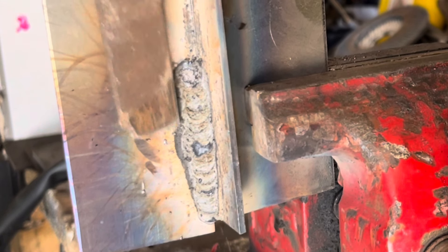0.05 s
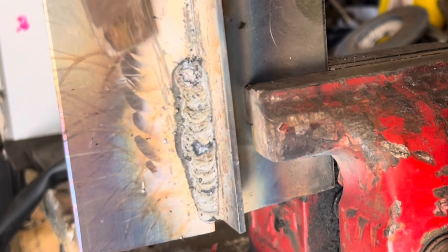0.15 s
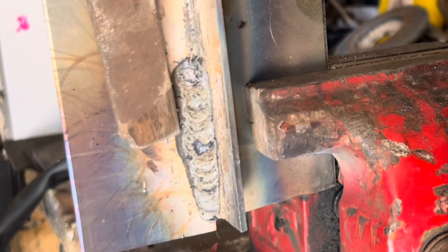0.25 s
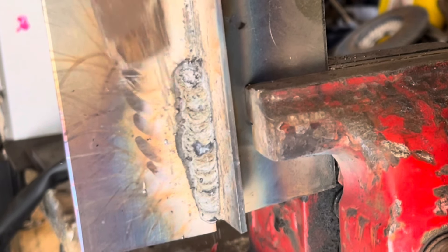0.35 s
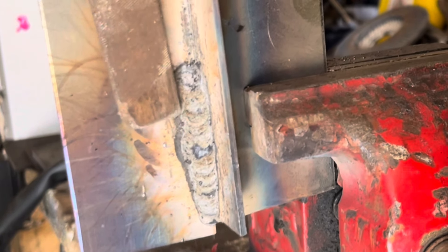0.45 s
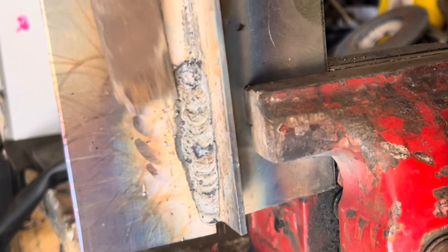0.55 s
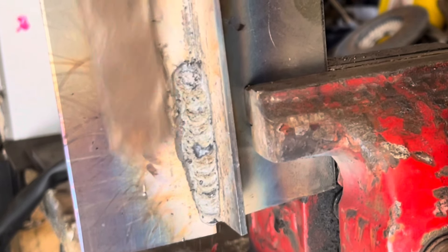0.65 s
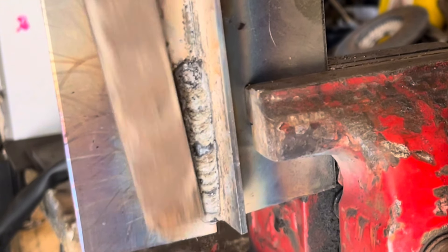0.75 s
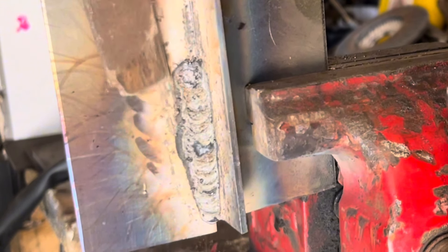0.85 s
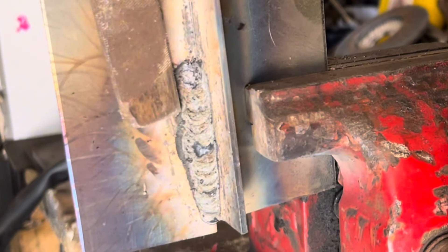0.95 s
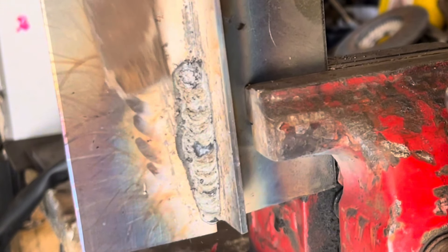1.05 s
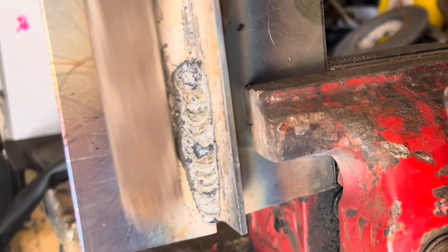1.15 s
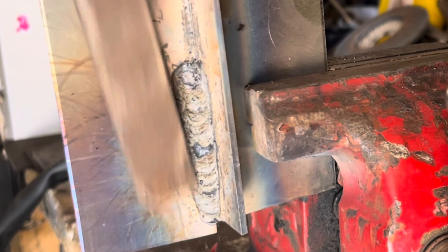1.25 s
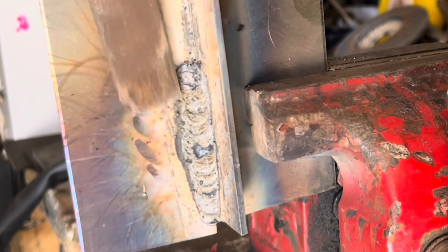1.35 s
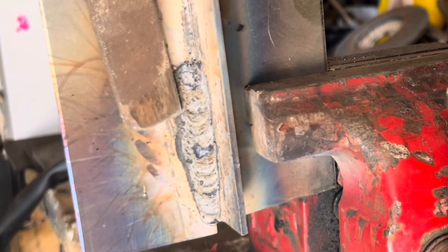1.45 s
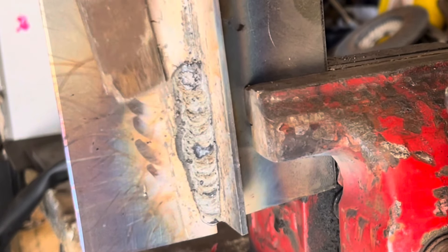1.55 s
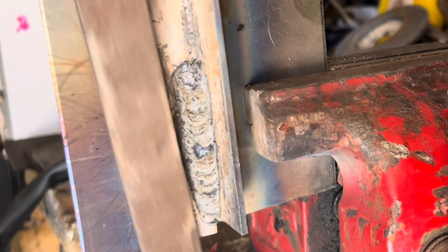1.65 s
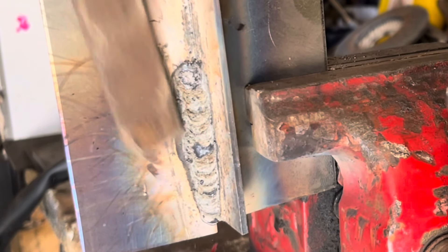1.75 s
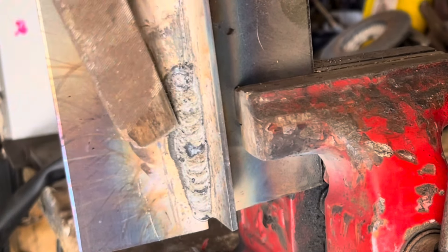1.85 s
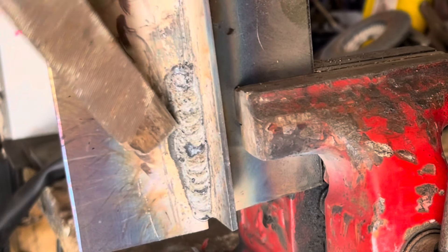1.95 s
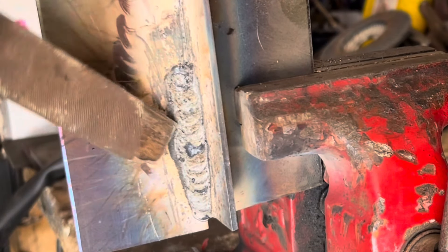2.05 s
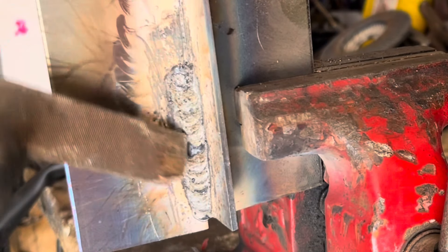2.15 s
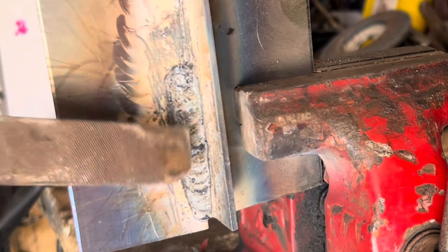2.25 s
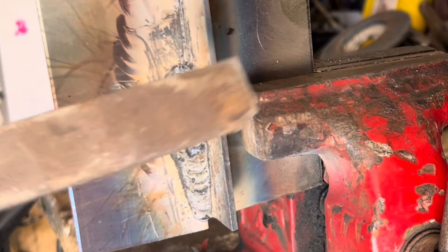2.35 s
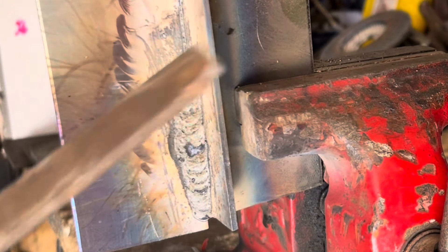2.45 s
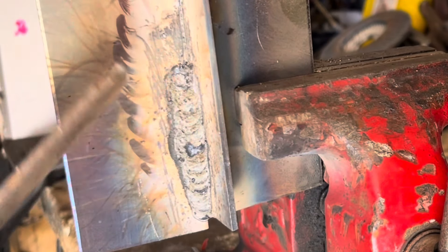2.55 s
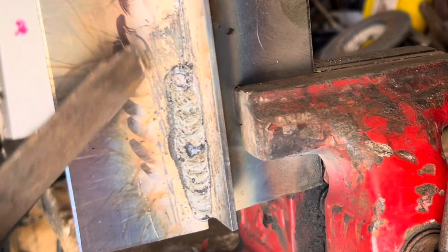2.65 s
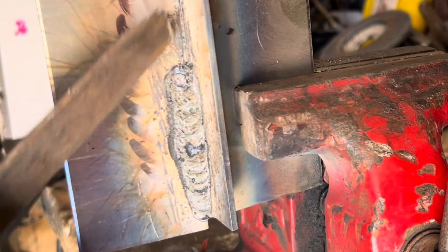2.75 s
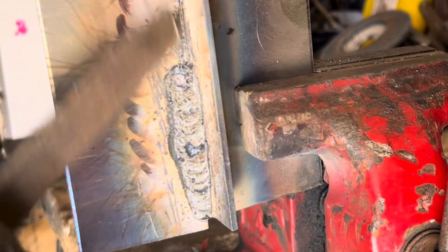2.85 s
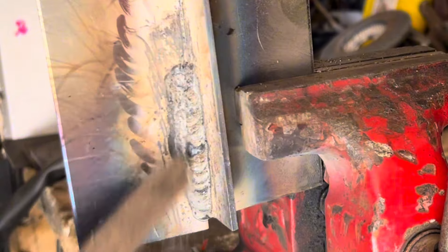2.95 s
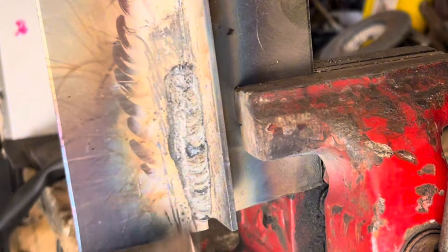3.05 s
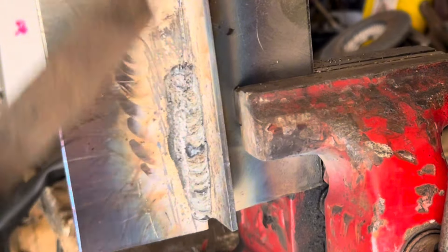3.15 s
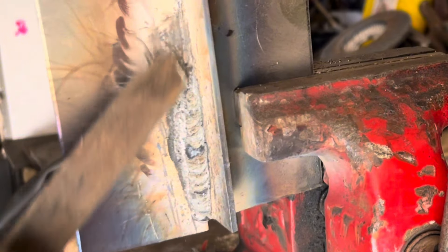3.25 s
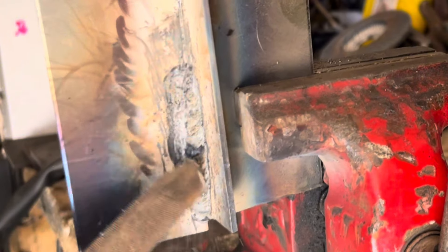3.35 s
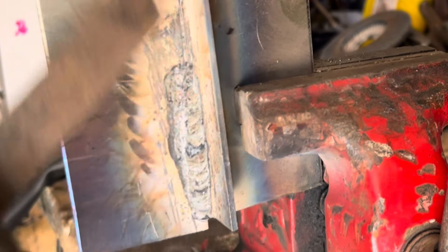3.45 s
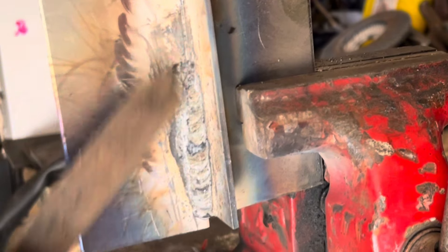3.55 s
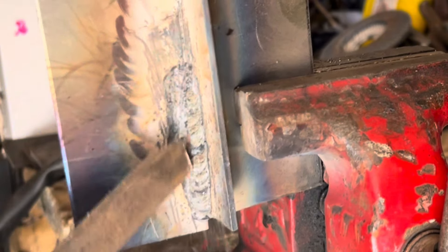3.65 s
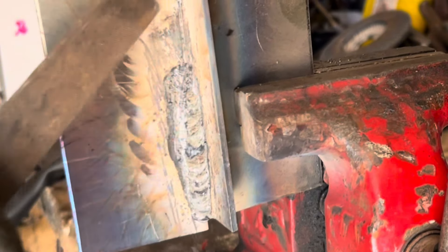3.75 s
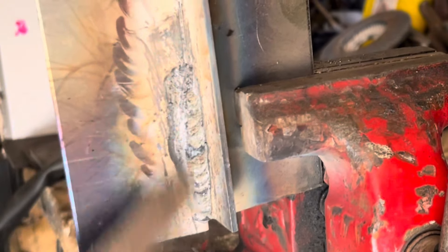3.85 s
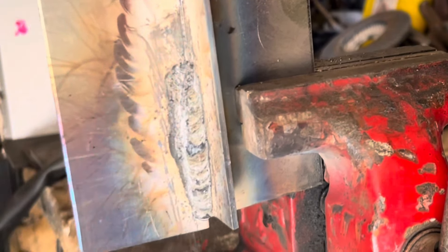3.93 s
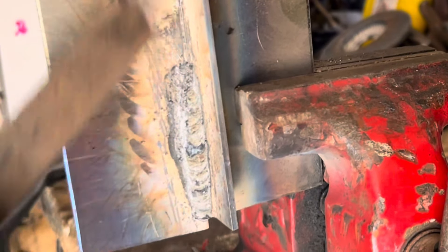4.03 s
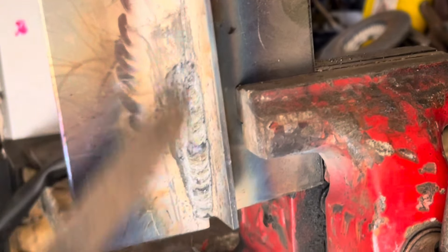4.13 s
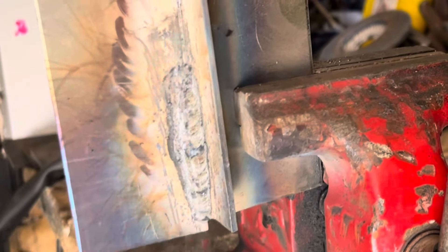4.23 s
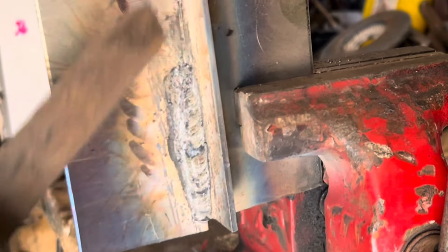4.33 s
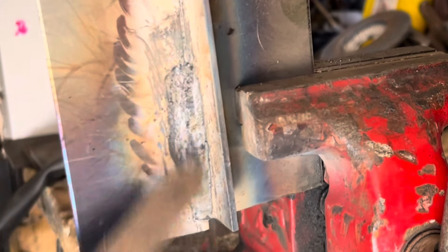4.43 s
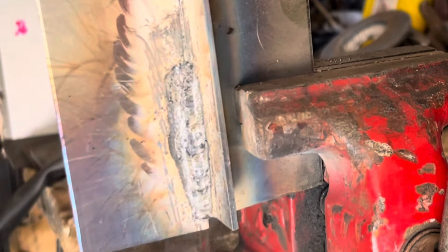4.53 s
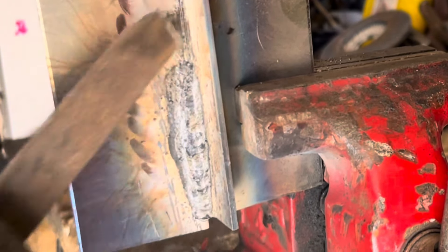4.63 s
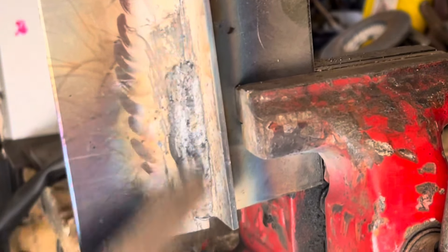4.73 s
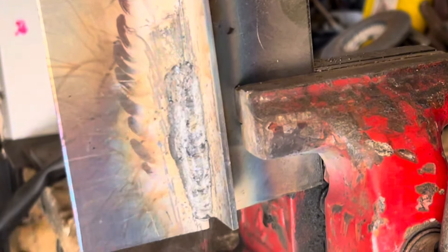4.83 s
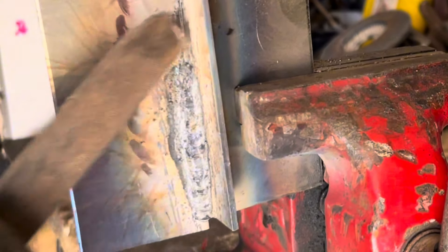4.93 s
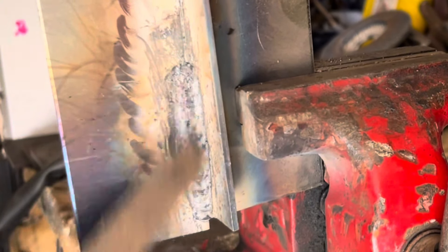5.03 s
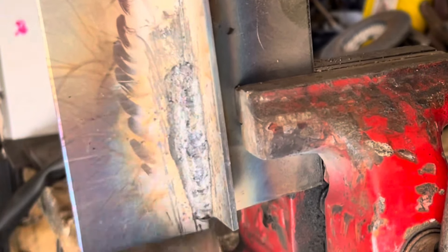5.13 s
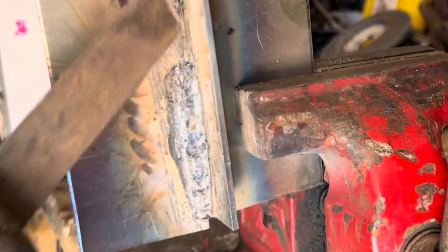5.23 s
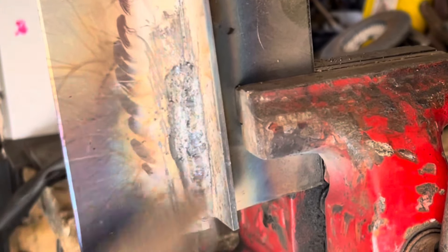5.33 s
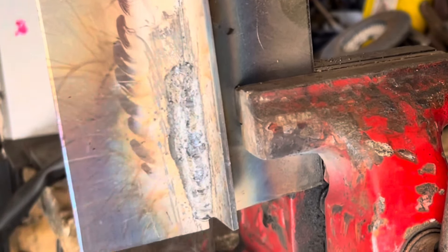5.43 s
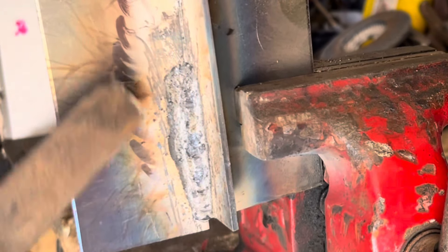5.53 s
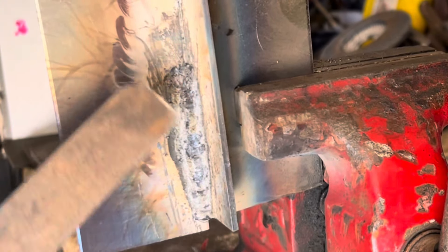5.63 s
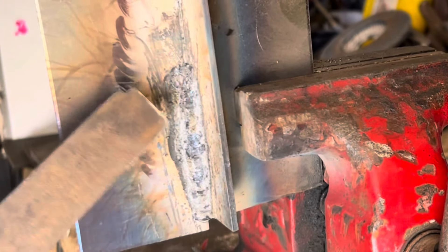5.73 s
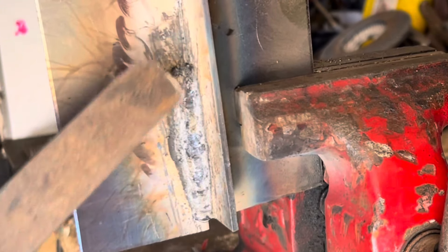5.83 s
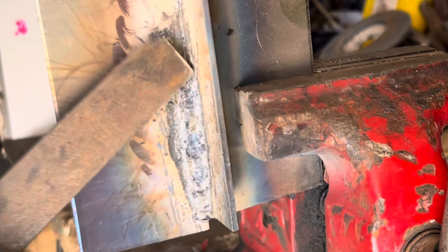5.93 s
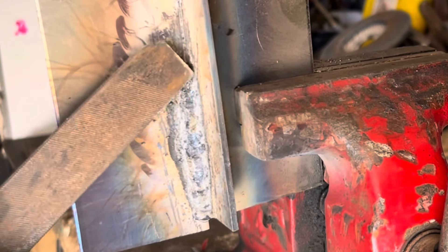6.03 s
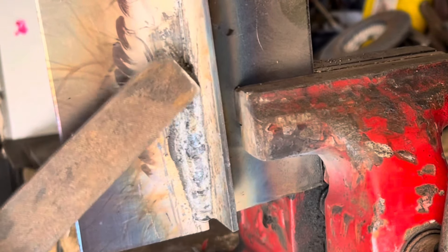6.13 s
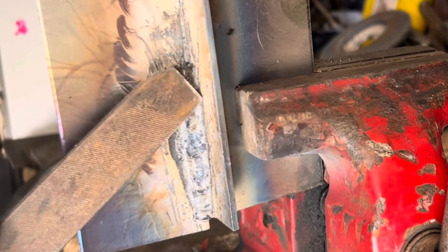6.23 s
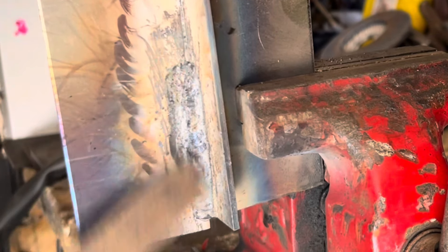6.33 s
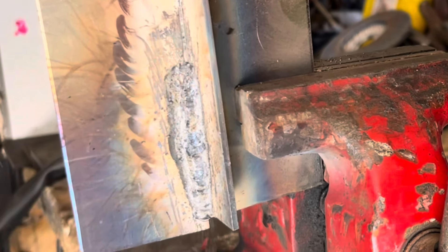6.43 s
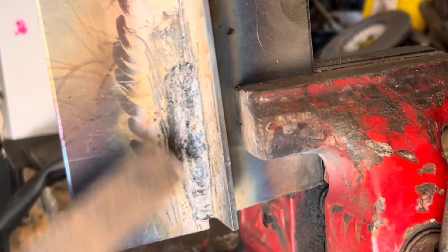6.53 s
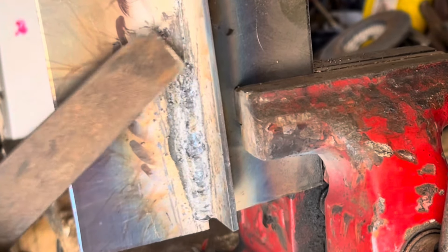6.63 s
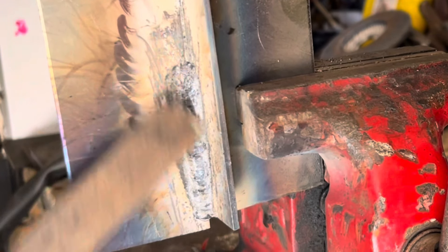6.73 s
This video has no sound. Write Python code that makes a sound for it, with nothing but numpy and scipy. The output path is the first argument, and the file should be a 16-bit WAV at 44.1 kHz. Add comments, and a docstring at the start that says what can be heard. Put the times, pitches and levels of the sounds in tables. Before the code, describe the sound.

A steel file rubs quickly back and forth over a welded plate clamped in a vise, with gritty rasps, small clicks and tiny squeaks. After a short lull, its tip jabs the weld about three times a second, each knock running into a crunchy scrape and a brief metallic ring. A few separate scrapes finish. It is heard close up in a small workshop with a faint fan hum.

```python
"""A small workshop with a humming fan, where a steel hand tool scrubs slag (a brittle crust) off a weld.
First the tool rubs flat, to and fro; then its tip is jabbed along the weld, knocking and scraping;
last its edge is pressed in. A scrape is thousands of tiny clicks as the steel catches and lets go.
They shake the tool and the welded plate, which is clamped in a vise. Touching muffles the steel,
so it rings longest when the tool slips off. All of it is heard from close by, in stereo."""
import sys
import numpy as np
from scipy import signal
from scipy.fft import rfft, irfft, next_fast_len
from scipy.io import wavfile
from scipy.ndimage import uniform_filter1d

SR = 44100
rng = np.random.default_rng(int(sys.argv[2]) if len(sys.argv) > 2 else 0)


def pcm_store(signal):
    """Save signal as 16-bit PCM."""
    levels = np.round(np.clip(np.atleast_2d(signal), -1, 1) * 32767)
    wavfile.write(sys.argv[1], SR, levels.astype(np.int16).T)


N = 298998
TIME = np.arange(N) / SR
HZ = np.fft.rfftfreq(N, 1 / SR)
SIDES = np.array([[.5], [-.5]])  # splits a difference between left and right

# Levels in all tables are relative. A spectrum says how strong each frequency is.
# spectrum of crumbling slag: f/Hz, level/dB
GRIT_SPECTRUM = [(2500, -7), (4300, -1.5), (6000, 3.5), (8000, -6.5), (10000, 1), (12500, 2.5),
                 (14000, -5.5), (15000, -16), (16000, -36)]
# spectrum of the tip rasping on the weld: f/Hz, level/dB
TIP_SPECTRUM = [(190, -19.5), (270, -5.5), (370, -6.5), (520, -0.5), (850, 1), (1050, -4), (1500, 0.5),
                (2200, -1), (3400, -4.5), (4500, -9), (7000, -24.5)]
# Modes are the tones an object rings at. Those of the plate and vise:
# f/Hz, level/dB, time to fade freely by 60 dB/s, left minus right/dB, left phase lead/rad
PLATE_MODES = [(298, 14, .5, 0, -.7), (2681, 19, 1.2, 5, .3), (3085, 7, .6, 1, .9), (4409, 6, 1, 1, -1.5),
               (191, 1, .08, 0, 0), (250, 5, .05, 0, 0), (540, 4, .05, 0, .5), (1158, 5, .08, 0, 0),
               (470, 5, .06, -2, .6), (372, 7, .12, 1, -.5), (620, 7, .05, 1, -.7), (838, 9, .05, -1, -1.5),
               (923, 9, .09, -3, -1.5), (1278, 8, .06, 0, .9), (1348, 8, .1, -2, 2.5),
               (1440, 6, .06, -1, -2.8), (1520, 4, .08, 0, 1), (2965, 7, .04, 1, .9), (3552, 2, .04, 2, .1),
               (5778, 3, .04, 2, -.4), (10938, 5, .12, 0, .1), (11372, 9, .18, 0, 0), (12080, 5, .06, 0, 0)]
# modes of the hand tool: same columns
HAND_TOOL_MODES = [(1957, 21, .3, 1, .6), (7429, 26, .33, 1, -2.1), (7958, 25, .27, 0, -3),
                   (8916, 16, .26, 0, 2.9), (9622, 23, .3, 0, 1.9), (14190, 13, .26, 1, -2),
                   (3922, 12, .1, 0, 1.2), (6642, 12, .04, 2, -1.5), (7052, 9, .06, 2, -1.8),
                   (8630, 13, .025, 0, 3.1)]


def amp(db):
    """Turns decibels into a factor to multiply by."""
    return 10 ** (np.asarray(db) / 20)


def unit(x):
    """Scales a signal to an average strength (rms) of one."""
    return x / np.sqrt(np.mean(x ** 2) + 1e-20)


def look_up(points, hz):
    """Reads between the rows of a (frequency, value) table, on a log frequency axis."""
    f, value = np.transpose(points)
    return np.interp(np.log(hz + 1), np.log(f + 1), value)


def colour(x, spectrum):
    """Filters a signal by a spectrum and scales it to strength one."""
    size = next_fast_len(N, True)
    gain = amp(look_up(spectrum, np.fft.rfftfreq(size, 1 / SR)))
    return unit(irfft(rfft(x, size) * gain, size)[:N])


def wander(rate_hz):
    """A smooth random curve that wiggles up to about the given rate."""
    size = next_fast_len(N, True)
    smoothing = 1 + (np.fft.rfftfreq(size, 1 / SR) / rate_hz) ** 4
    return unit(irfft(rfft(rng.standard_normal(size)) / smoothing, size)[:N])


def stereo(left, right):
    """Gives two spectra the small differences in timing and level between left and right."""
    # how far the left wave runs ahead: f/Hz, phase/rad
    phase_lead = [(100, 0), (400, 1.1), (850, -1), (1800, -0.9), (3000, 0.1), (4500, -1.7), (5800, 2.6),
                  (7500, 0), (9400, -5), (10800, -8.5), (13500, -4.5), (14600, -15)]
    # how much louder the left is: f/Hz, level/dB
    balance = [(100, -.5), (1000, .5), (2200, 1.5), (4200, 4), (6500, 5.5), (8000, -1)]
    half = amp(look_up(balance, HZ) / 2) * np.exp(.5j * look_up(phase_lead, HZ))
    return np.array([left * half, right / half])


def diffuse(common, other):
    """Stereo spectra of sound from all around: partly alike on both sides, partly not."""
    # how unlike the sides are: f/Hz, share from 0 to 1
    unlike = [(100, 0.12), (300, 0.7), (900, 1), (4000, 1), (7000, 0.6), (12000, 0.4)]
    apart = np.clip(look_up(unlike, HZ), 0, 1) / 2
    common = rfft(common, N) * np.sqrt(1 - apart)
    other = rfft(other, N) * np.sqrt(apart)
    return stereo(common + other, common - other)


def fan(hum_db=-1, air_db=-48.5, waver=0.0017, flutter_db=-4.5):
    """Blades and motor hum, wavering a little, over a soft rush of air."""
    # blade and motor tones: f/Hz, level/dB
    hum_tones = [(86.1, -62.5), (172.3, -63.5), (339.1, -62.5), (592.2, -52.5), (678.3, -70), (1017, -59),
                 (1190, -55), (1357, -64.5), (1782, -62.5), (2379, -68), (2972, -64.5), (4081, -73)]
    # spectrum of the moving air: f/Hz, level/dB
    air_spectrum = [(15, -35), (30, -15), (80, -21), (250, -9), (600, -6.5), (1100, -8.5), (1600, -17.5),
                    (3000, -18), (6000, -21.5), (8000, -40), (13000, -29), (16000, -54)]
    clock = np.cumsum(1 + waver * wander(rate_hz=6.05)) / SR
    hum = sum(amp(db) * np.sqrt(2) * np.sin(2 * np.pi * (hz * clock + rng.random()))
              for hz, db in hum_tones)
    rushes = [colour(rng.standard_normal(N), air_spectrum) for _ in range(2)]
    air = irfft(diffuse(*rushes), N)
    return amp(hum_db + flutter_db * wander(rate_hz=3.9)) * hum + amp(air_db) * unit(air)


def workshop(near_db=-5, far_db=-8.0, near_fade_s=.019, build_up_s=0.0045):
    """The echo as a filter: quick reflections off bench and vise, then the tail of the room."""
    # length of the room's echo: f/Hz, time to fade by 60 dB/s
    fade_times = [(80, 0.92), (300, 0.54), (1000, 0.47), (4000, 0.43), (12000, 0.18)]
    # spectrum of the reflections: f/Hz, level/dB
    echo_spectrum = [(80, -8), (400, 2.5), (1500, -3.5), (4000, -11), (7000, -7.5), (14000, -49)]
    t = TIME[:SR]
    near = rng.standard_normal((2, SR)) * amp(-60 * t / near_fade_s)
    hz, age, bands = signal.stft(rng.standard_normal((2, SR)), SR, nperseg=256)
    bands *= amp(-60 * age / look_up(fade_times, hz)[:, None])
    far = signal.istft(bands, SR)[1][:, :SR] * (1 - np.exp(-t / build_up_s))
    echo = amp(near_db) * near / np.linalg.norm(near[0]) + amp(far_db) * far / np.linalg.norm(far[0])
    return diffuse(*echo) * amp(look_up(echo_spectrum, HZ))


def rustles(unsteady_db=2):
    """The tool is turned in the hand, making faint swells of hiss."""
    # turns of the tool: t/s, length/s, level/dB
    turns = [(2.167, 0.33, -59.5), (5.48, 0.21, -54)]
    # spectrum of the hiss: f/Hz, level/dB
    hiss_spectrum = [(3000, -17), (6000, 0), (8300, -36), (10500, 5), (13500, -7), (15500, -30)]
    swells = sum(amp(db) * np.sin(np.pi * np.clip((TIME - start) / length, 0, 1))
                 for start, length, db in turns)
    flicker = amp(unsteady_db * wander(rate_hz=38))
    hiss = rfft(swells * flicker * colour(rng.standard_normal(N), hiss_spectrum))
    return irfft(stereo(hiss, hiss), N)


def squeaks(unsteady=0.018):
    """Steel sticks and slips on steel so fast that it whistles, at an unsteady pitch."""
    # brief whistles: t/s, length/s, f/Hz, level/dB
    whistles = [(.235, 0.026, 5480, -32), (0.503, 0.035, 5510, -32), (0.742, 0.024, 5470, -32),
                (0.802, 0.055, 5750, -53), (3.342, 0.024, 5500, -27), (3.676, 0.025, 5480, -37)]
    drift = 1 + unsteady * wander(rate_hz=160)
    out = np.zeros(N)
    for start, length, hz, db in whistles:
        swell = np.cos(np.pi * np.clip((TIME - start) / length, -.5, .5))
        out += amp(db) * swell * np.sin(2 * np.pi * hz * np.cumsum(drift) / SR)
    return out


def free_ring(hz, fade_s, balance_db, lead):
    """One second of a single mode dying away untouched, in stereo."""
    t = TIME[:SR]
    return amp(SIDES * balance_db - 60 * t / fade_s) * np.cos(2 * np.pi * hz * t + SIDES * lead)


def slipping_off(plate_db=-3, vise_db=4, rise_s=.006):
    """Once the tool slips off the weld, the long-lasting modes ring on freely."""
    # slips: t/s, tool's clang/dB, tool's high zing/dB, ring of plate and vise/dB
    slips = [(0.005, -27.5, -39, -53), (0.705, -45, -29, -29.5), (0.831, -49, -41, -43),
             (1.385, -28, -53, -71), (1.76, -60, -54, -46), (2.985, -23.5, -34, -48.5),
             (3.339, -36, -37, -67), (3.62, -35, -48, -67), (3.881, -19.5, -35.5, -38),
             (4.18, -21.5, -25, -32.5), (4.463, -19.5, -33.5, -30.5), (4.756, -15.5, -38.5, -34.5),
             (5.07, -28.5, -34, -35), (5.356, -20, -37, -35.5), (6.408, -26, -40, -37)]
    out = np.zeros((2, N + SR))
    swell = 1 - np.exp(-TIME[:SR] / rise_s)
    for start, clang_db, zing_db, ring_db in slips:
        first = round(start * SR)
        tool_levels = [(2000, clang_db), (7400, zing_db)]
        plate_levels = [(300, ring_db + vise_db), (2700, ring_db + plate_db)]
        for modes, levels in (HAND_TOOL_MODES, tool_levels), (PLATE_MODES, plate_levels):
            for hz, db, fade_s, *place in modes:
                if fade_s > .25:
                    # each mode is set against the strongest within 3/4 of an octave
                    strongest_db = max(level for f, level, *_ in modes if abs(np.log2(f / hz)) < .75)
                    gain = amp(look_up(levels, hz) + db - strongest_db)
                    out[:, first:first + SR] += gain * swell * free_ring(hz, fade_s, *place)
    return out[:, :N]


def muffled_ring(modes, loss_per_s):
    """Modes as a stereo filter; touching adds a loss that makes each one weaker and shorter."""
    out = np.zeros((2, len(HZ)), complex)
    for hz, db, fade_s, balance_db, lead in modes:
        own_loss = np.log(1000) / fade_s
        peak = own_loss / (own_loss + loss_per_s + 1j * np.pi * (HZ - hz ** 2 / (HZ + 1)))
        out += amp(db + SIDES * balance_db) * np.exp(1j * SIDES * lead) * peak
    return out


def steel(force, surroundings, tool_db, loss_per_s):
    """Turns a contact force into sound by letting it shake the tool and its surroundings."""
    response = irfft(surroundings + amp(tool_db) * muffled_ring(HAND_TOOL_MODES, loss_per_s), N)
    early = 64  # samples: the response begins just before time zero
    response = np.roll(response, early, axis=1)[:, :SR]
    return signal.fftconvolve(force, response, axes=1)[:, early:early + N]


def knocks(body_db=-1.5, crack_db=4, rise_s=.0005, body_s=.0048, crack_s=.003):
    """Each blow crushes slag for a few milliseconds; its high crack dies before its body."""
    # the tool strikes the weld: t/s, level/dB, treble compared with that level/dB
    blows = [(0.198, -16.5, 4.5), (0.892, -13.5, -1), (1.117, -21, -3), (1.375, -12.5, -5.5),
             (1.587, -18.5, -10), (1.613, -16, 8.5), (2.876, -7, -7.5), (3.208, -13, -2),
             (3.226, -8.5, -11), (3.281, -12, -16), (3.513, -8.5, -1), (3.545, -13, -2), (3.794, -8, 0),
             (4.091, -9, -8.5), (4.133, -19, -5), (4.379, -8, -8), (4.66, -7.5, -10), (4.711, -11.5, -1.5),
             (4.955, -10, -0.5), (4.997, -17.5, 4), (5.267, -11.5, -27), (6.399, -10, -3)]
    body, crack = np.zeros((2, N))
    for start, db, treble_db in blows:
        first = round(start * SR)
        age = TIME[first:] - TIME[first]
        blow = amp(db) * (1 - np.exp(-age / rise_s))
        body[first:] += blow * np.exp(-age / body_s)
        crack[first:] += blow * amp(treble_db) * np.exp(-age / crack_s)
    body *= colour(rng.standard_normal(N), TIP_SPECTRUM)
    crack *= colour(rng.standard_normal(N), GRIT_SPECTRUM)
    return amp(body_db) * body + amp(crack_db) * crack


def catches(spectrum, per_s, spread_db, patchy_db):
    """Edges catch and let go: a stream of unequal clicks whose tone shifts as the contact moves."""
    sizes = amp(spread_db * np.minimum(rng.exponential(1, N), 4)) * rng.choice([-1, 1], N)
    clicks = sizes * (rng.random(N) < per_s / SR)
    bands = signal.stft(clicks, nperseg=512)[2]
    patches = uniform_filter1d(rng.standard_normal(bands.shape), size=6, axis=0)  # blur over frequency
    patches = unit(uniform_filter1d(patches, size=5, axis=1))  # and over time
    return colour(signal.istft(bands * amp(patchy_db * patches))[1][:N], spectrum)


STROKE_TIMES = TIME[::32]  # a coarser clock, enough for the rise and fall of a stroke


def stroke(start, length, db, swell_db, grit_db, rumble_db, attack_s, release_s):
    """Strength of rasp, grit and rumble in one stroke: it sets in, swells or sags, then dies away."""
    wear_db = -4.5  # loose slag wears off along the stroke
    shudder_s = 0.015  # the bench shakes on a little longer
    age = STROKE_TIMES - start
    along = np.clip(age / length, 0, 1) - .5
    after = np.maximum(age - length, 0)
    held = amp(db + swell_db * along) * np.exp(np.minimum(age, 0) / attack_s)
    rasp = held * np.exp(-after / release_s)
    grit = rasp * amp(grit_db + wear_db * along)
    rumble = held * amp(rumble_db) * np.exp(-after / (release_s + shudder_s))
    return np.array([rasp, grit, rumble])


def scraping(strokes, spectrum, rasp_db, grit_db, rumble_db, chatter_db=2, crumble_db=2):
    """Friction force: steel rasps, slag crumbles, the bench shakes; weld ripples make it all chatter."""
    # spectrum of the shaking bench: f/Hz, level/dB
    bench_spectrum = [(15, -38), (35, -6), (70, 5), (95, 2.5), (130, 3.5), (250, -2.5), (330, -1),
                      (430, -5), (700, -40)]
    strengths = np.linalg.norm(strokes, axis=0)  # overlapping strokes add in power
    rasp, grit, rumble = (np.interp(TIME, STROKE_TIMES, strength) for strength in strengths)
    darting = 1 + .56 * SIDES * wander(rate_hz=200)  # the contact darts left and right
    crumble = unit(amp(crumble_db * wander(rate_hz=600)))
    rasp = rasp * darting * catches(spectrum, per_s=5000, spread_db=2.5, patchy_db=4)
    grit = grit * crumble * catches(GRIT_SPECTRUM, per_s=2400, spread_db=2.0, patchy_db=4.5)
    rumble = rumble * colour(rng.standard_normal(N), bench_spectrum)
    chatter = unit(amp(chatter_db * wander(rate_hz=375)))
    return (amp(rasp_db) * rasp + amp(grit_db) * grit + amp(rumble_db) * rumble) * chatter


def rubbing(push_swell_db=-1.5, pull_swell_db=2):
    """The tool lies flat: pushes that lose force and pulls that gain it, over a light drag."""
    # spectrum of the flat side rasping: f/Hz, level/dB
    flat_spectrum = [(190, -31), (270, -8), (370, -3), (520, -2.5), (850, 0.5), (1050, -13), (1500, -1.5),
                     (2050, -7.5), (2450, -2), (3400, -13.5), (4500, -20), (7000, -53)]
    # hard pushes, about four a second: t/s, length/s, level/dB, grit/dB, rumble/dB
    # (grit and rumble are compared with the level)
    pushes = [(-0.03, 0.029, -21, -10, -0.5), (0.199, 0.028, -21, -9.5, -1),
              (0.425, 0.0099, -18.5, -1.5, -5), (0.658, 0.052, -19.5, 0.5, -11),
              (0.896, 0.011, -20, -6.5, -5.5), (1.123, 0.054, -22.5, -1, -7),
              (1.369, 0.025, -23.5, -12, -2), (1.588, 0.066, -21.5, -4, -11)]
    # a lighter pull after each push: same columns
    pulls = [(0.062, 0.055, -29.5, -4.5, -24), (0.294, 0.052, -32.5, -1.5, -9),
             (0.542, 0.046, -31, -2.5, -12), (0.76, 0.073, -26.5, 1, -21), (1.033, 0.018, -31.5, -4.5, -24),
             (1.232, 0.094, -26, -0.5, -25), (1.489, 0.05, -36.5, -5.5, -31),
             (1.693, 0.087, -27.5, 0.5, -17)]
    # the tool trails over the plate: t/s, length/s, level/dB, swell/dB, grit/dB, rumble/dB
    drags = [(0, 0.53, -35, 0.5, -14, -6), (0.647, 0.33, -36.5, -6, -18, -11),
             (1.12, 0.74, -63, 14, -26, -13), (2.142, 0.03, -39, 14, -8, -2.5),
             (3.346, 0.21, -38.5, -5, -18, -5), (3.627, .14, -38, -13, -13, -7)]
    strokes = [stroke(start, length, db, push_swell_db, grit, rumble, attack_s=.0085, release_s=.0096)
               for start, length, db, grit, rumble in pushes]
    strokes += [stroke(start, length, db, pull_swell_db, grit, rumble, attack_s=.0086, release_s=.0086)
                for start, length, db, grit, rumble in pulls]
    strokes += [stroke(*drag, attack_s=.028, release_s=.024) for drag in drags]
    return scraping(strokes, flat_spectrum, rasp_db=-3.5, grit_db=0.5, rumble_db=-7, chatter_db=2.36)


def pressing():
    """The edge is leant on the weld in single scrapes."""
    # spectrum of the edge rasping: f/Hz, level/dB
    edge_spectrum = [(190, -18), (280, -6), (400, -8.5), (600, -1), (850, 5), (1100, -13.5), (1500, -7),
                     (2200, -6.5), (3400, -16), (4500, -8.5), (7000, -33)]
    # scrapes: t/s, length/s, level/dB, swell/dB, grit/dB, rumble/dB
    presses = [(5.944, 0.0068, -41.5, 5, -9.5, -16), (6.113, 0.044, -33, 6, -20, -14),
               (6.267, 0.087, -23.5, 25, -9, -17.5), (6.396, .032, -19.5, 2, -13.5, -13.5),
               (6.662, 0.0074, -33.5, -3, -14, -10), (6.734, 0.06, -16, 1.5, -11, -19.5)]
    strokes = [stroke(*press, attack_s=.0064, release_s=.017) for press in presses]
    return scraping(strokes, edge_spectrum, rasp_db=-3.5, grit_db=1.5, rumble_db=-3)


def jabbing():
    """The tip lands and skids with fading force until the arm makes it bite into the weld."""
    # jabs: t/s, skid length/s, skid level/dB,
    # then for the bite: length/s, level/dB, swell/dB, grit/dB, rumble/dB
    jabs = [(2.871, 0.068, -21, 0.044, -14, 0.5, -8.5, -8), (3.205, 0.067, -20.5, 0.065, -22, 1.5, -11, -4),
            (3.502, 0.042, -20, .08, -20.5, -8.5, -8.5, -3),
            (3.786, 0.029, -19.5, 0.056, -13, 3.5, -11.5, -8),
            (4.09, 0.047, -22.5, 0.045, -12.5, -1, -9.5, -10.5),
            (4.379, 0.032, -17.5, 0.048, -13, -1.5, -10, -13.5),
            (4.657, 0.052, -28.5, 0.036, -12.5, 8.5, -11, -14.5),
            (4.954, 0.049, -26, 0.066, -14, -3.5, -10, -11.5),
            (5.266, 0.027, -19.5, 0.055, -13.5, 7.5, -11.5, -17)]
    strokes = []
    for start, skid_s, skid_db, *bite in jabs:
        strokes.append(stroke(start, skid_s, skid_db, swell_db=-5, grit_db=-12, rumble_db=-12.5,
                              attack_s=.0004, release_s=.005))
        strokes.append(stroke(start + skid_s, *bite, attack_s=.0032, release_s=.01))
    return scraping(strokes, TIP_SPECTRUM, rasp_db=-4, grit_db=-1.0, rumble_db=-7.5)


def scene(direct_db=-3.0, plate_db=-1):
    """All strokes sound through steel and room, over the fan; the tool is most muffled lying flat."""
    direct = amp(direct_db) * stereo(0.81, 0.88)
    plate = amp(plate_db) * muffled_ring(PLATE_MODES, loss_per_s=11.5)
    surroundings = direct + plate + workshop()
    flat = steel(rubbing(), surroundings, tool_db=-5.5, loss_per_s=28)
    edge = steel(pressing(), surroundings, tool_db=-.5, loss_per_s=22)
    tip = steel(jabbing() + knocks() + squeaks(), surroundings, tool_db=-.5, loss_per_s=24)
    return flat + edge + tip + slipping_off() + rustles() + fan()


def record(dry):
    """Rounds off the highest peaks and cuts the very top of the treble."""
    knee, top_hz = .6, 15900  # rounding starts at the knee
    excess = np.maximum(abs(dry) - knee, 0)
    rounded = np.clip(dry, -knee, knee) + np.sign(dry) * (1 - knee) * np.tanh(excess / (1 - knee))
    low_pass = signal.firwin(127, top_hz, window=("kaiser", 9), fs=SR)
    return signal.oaconvolve(rounded, low_pass[None], "same")


dry = scene()
out = record(dry)
pcm_store(out)
```